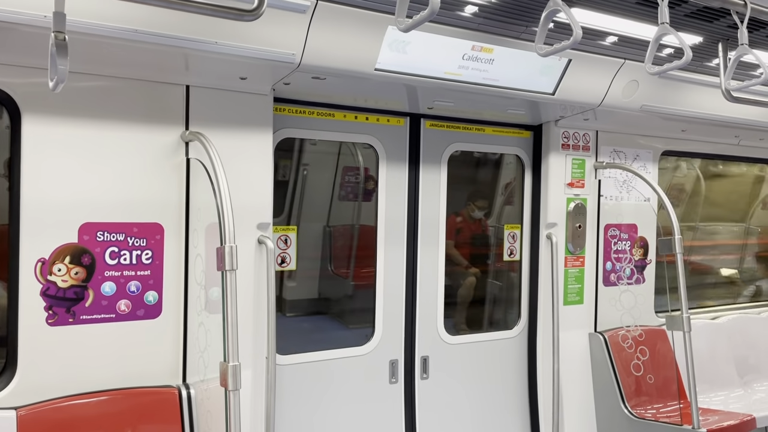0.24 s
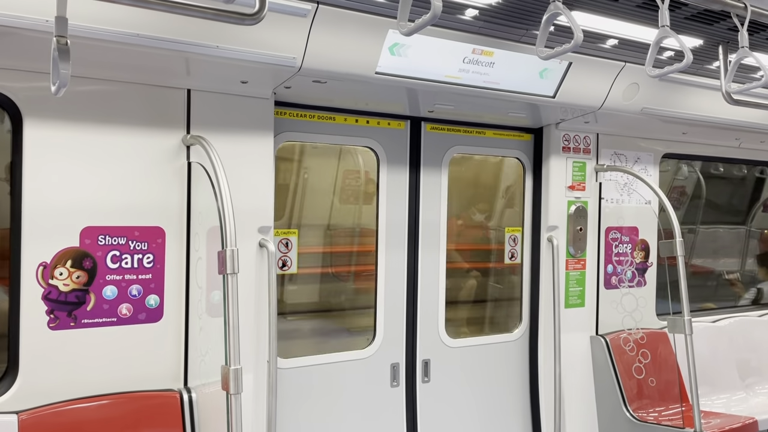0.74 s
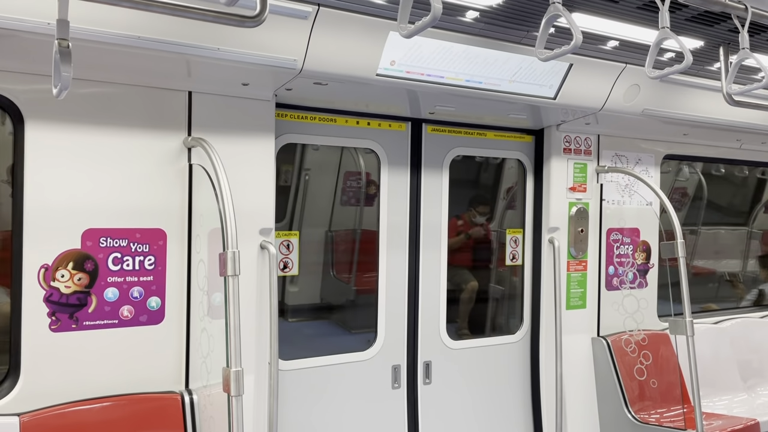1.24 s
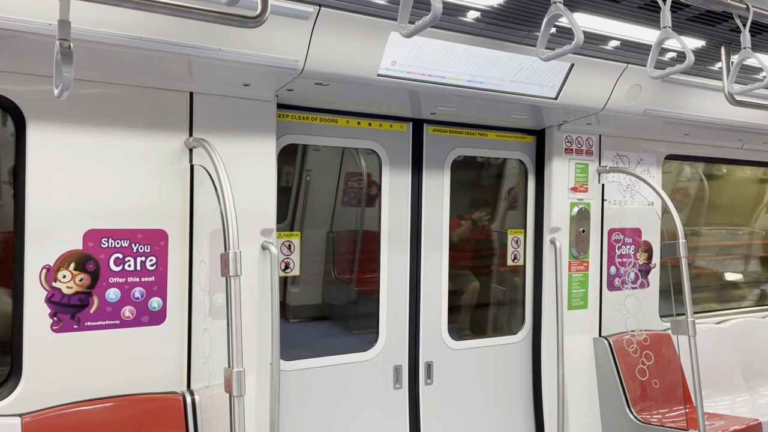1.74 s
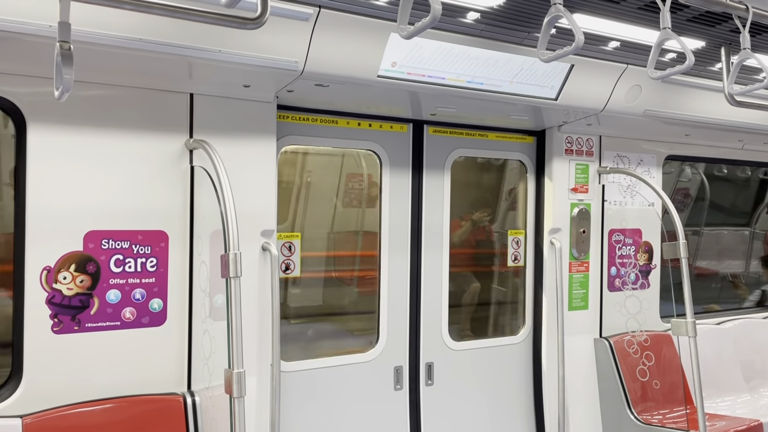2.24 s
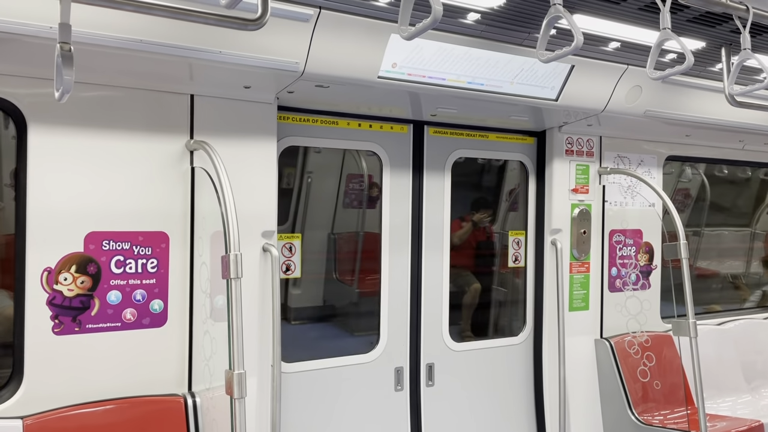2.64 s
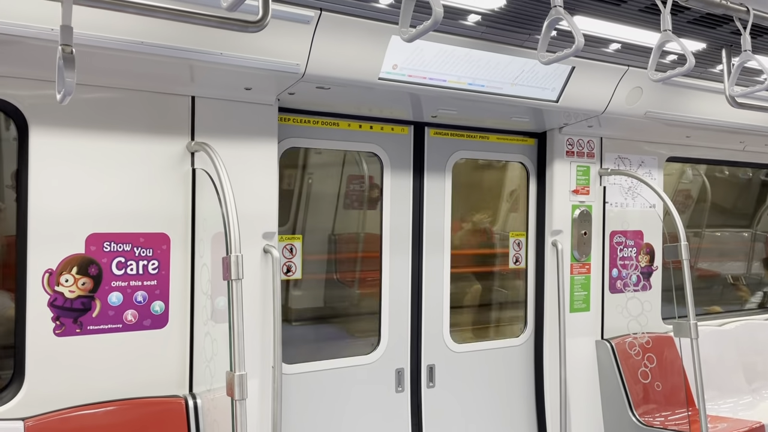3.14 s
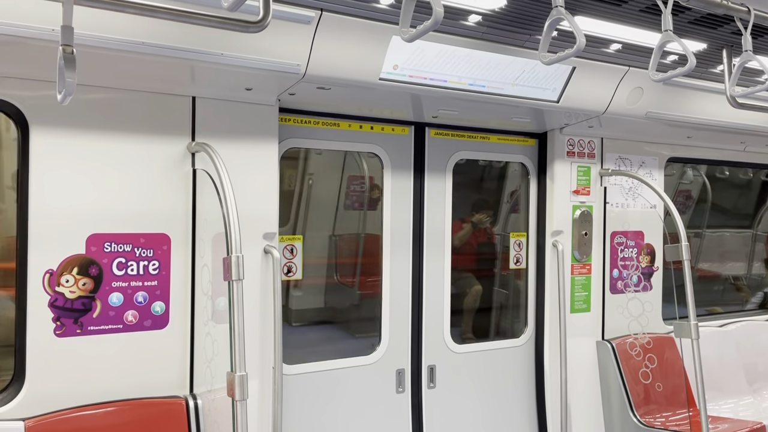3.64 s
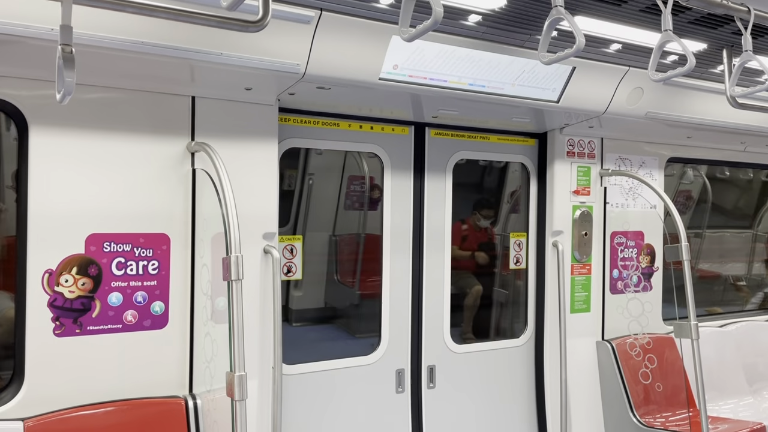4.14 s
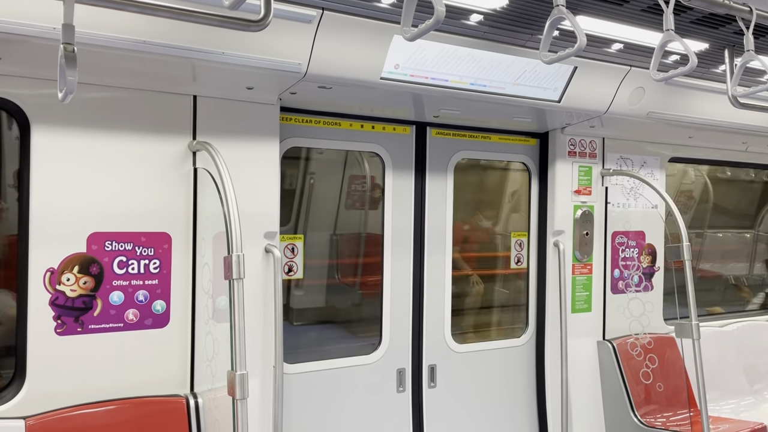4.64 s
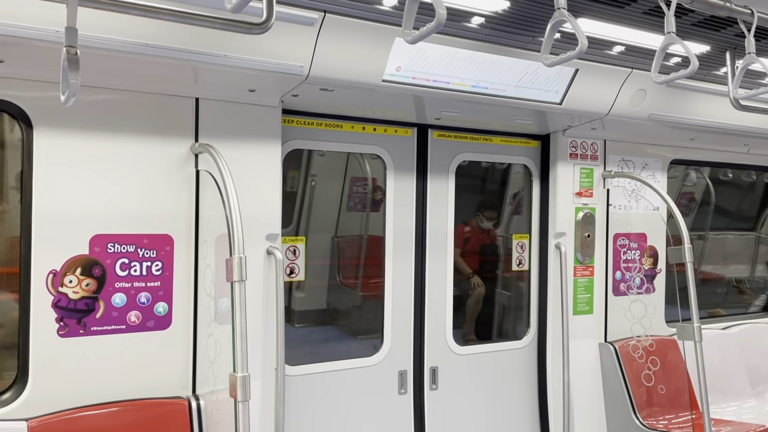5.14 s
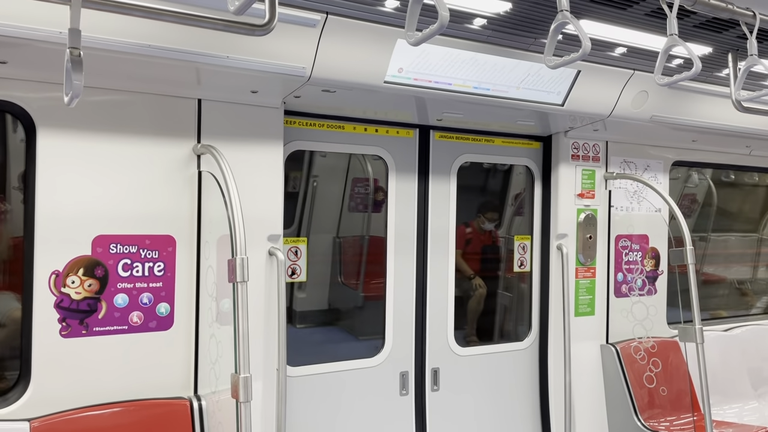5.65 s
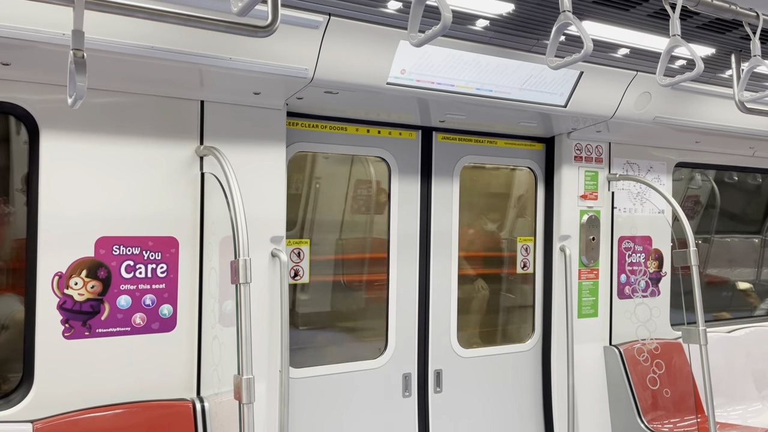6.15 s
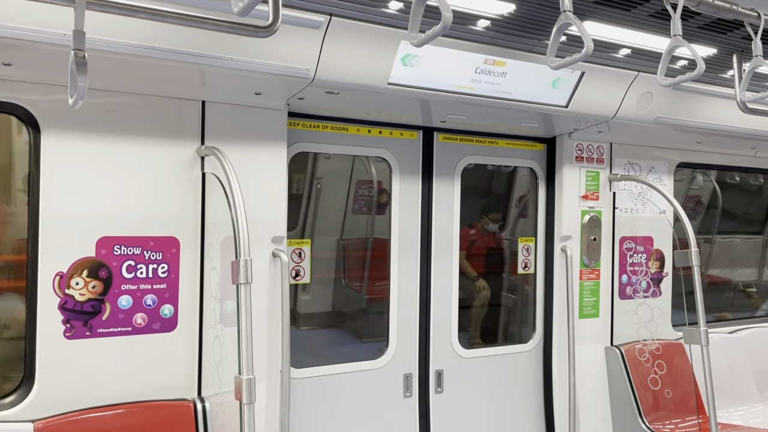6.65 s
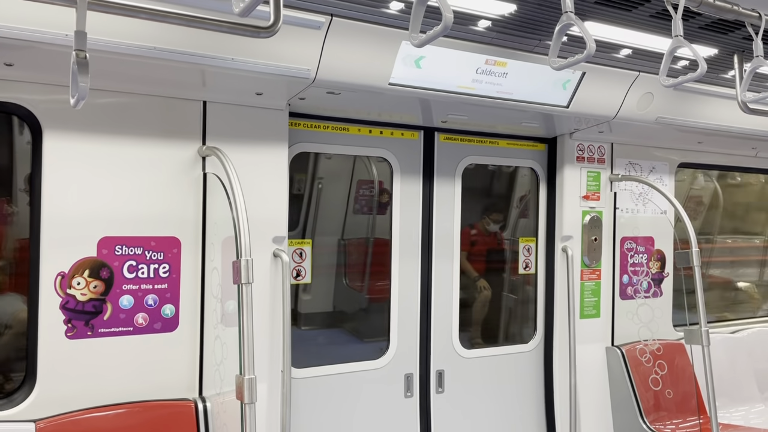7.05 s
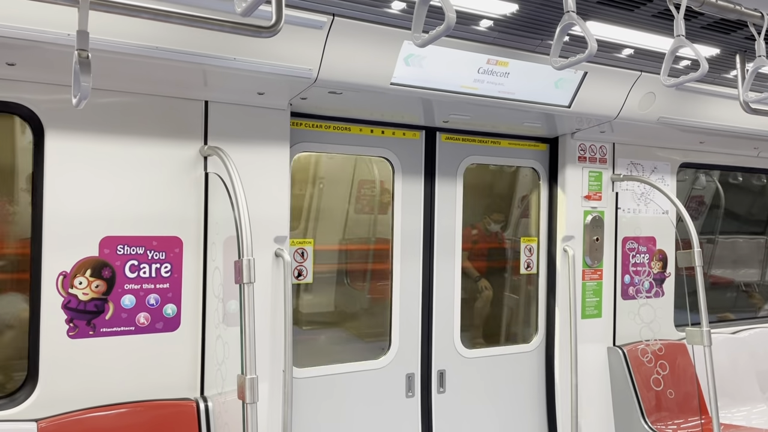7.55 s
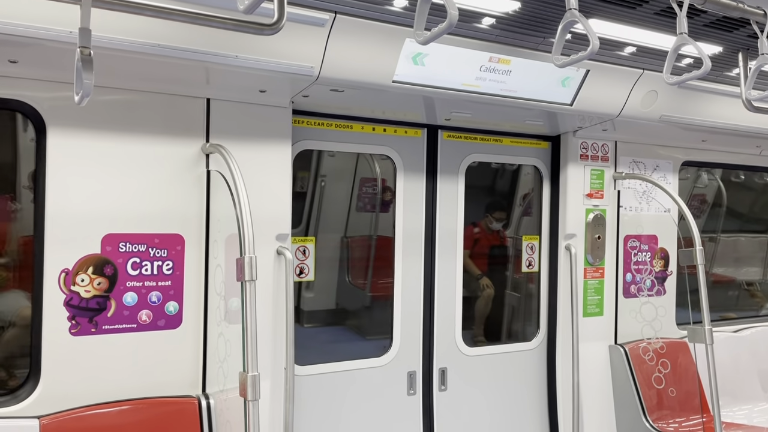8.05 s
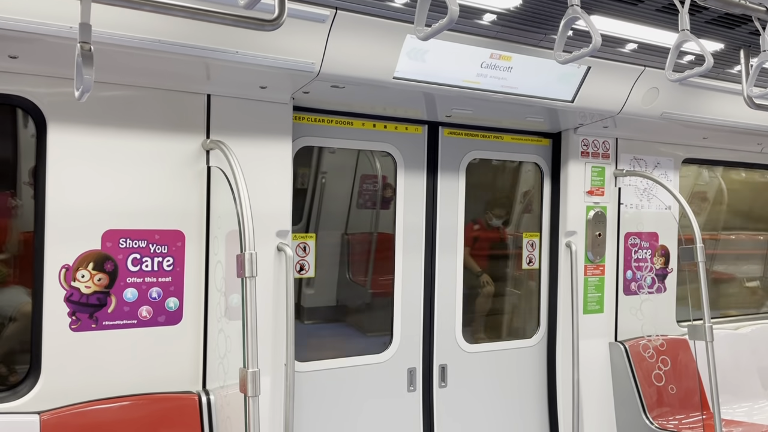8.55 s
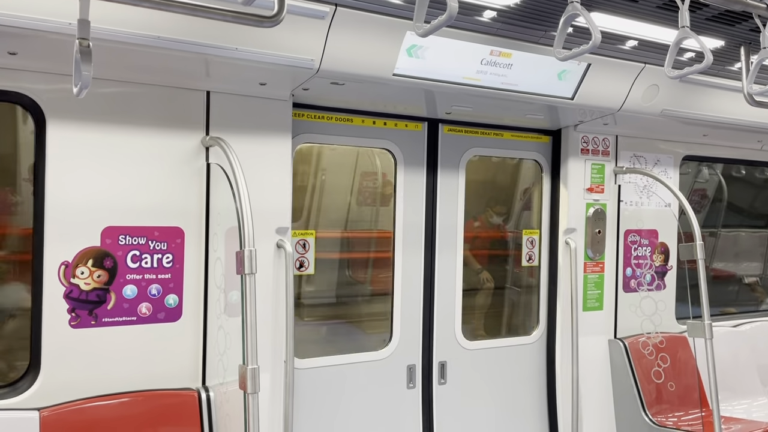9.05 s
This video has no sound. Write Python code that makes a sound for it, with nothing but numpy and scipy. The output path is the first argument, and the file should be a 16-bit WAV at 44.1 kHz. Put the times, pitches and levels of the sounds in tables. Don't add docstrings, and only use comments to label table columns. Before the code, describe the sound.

Inside a metro car speeding through a tunnel, a loud steady rail roar with low floor boom, wheel ring, draughty hiss and brief air puffs.

```python
import sys
import numpy as np
from scipy import signal
from scipy.fft import rfft, irfft, next_fast_len
from scipy.io import wavfile
from scipy.ndimage import uniform_filter1d, map_coordinates

SR = 44100
rng = np.random.default_rng(int(sys.argv[2]) if len(sys.argv) > 2 else 0)


def volts(x):
    e = np.asarray(x, float) / 20
    return 10 ** e


def output_pcm(signal):
    pcm = np.clip(np.atleast_2d(signal).T, -1, 1) * 32767
    wavfile.write(sys.argv[1], SR, np.round(pcm).astype(np.int16))


N = 410394

# (frequency [Hz], width [Hz], level [dB])
RAIL_MODES = [(672, 155, -7), (754, 303, -1.5), (938, 390, -8), (1297, 516, -12.5), (1474, 92, -21)]
# (frequency [Hz], width [Hz], level [dB])
FLOOR_MODES = [(50.3, 21, 0), (61.2, 15, 1.5), (86.4, 37, -2), (138.3, 57, -1.5), (170.7, 42, -11)]
# (frequency [Hz], width [Hz], level [dB])
PANEL_MODES = [(268.3, 93, 0.4), (328, 36, -1.5), (427.5, 223, 2)]
# (frequency [Hz], width [Hz], level [dB])
WHEEL_MODES = [(1987, 130, 4), (2106, 110, 4), (2230, 173, 1.5)]
# (time [s], level [dB])
ROUGHNESS = [
    (0.0, 2.5),
    (1.2, 1),
    (1.8, -0.1),
    (3.0, 0.24),
    (5.4, -1.05),
    (6.4, -2.5),
    (7.1, -2),
    (7.7, -0.6),
    (9.31, -0.95),
]
# (frequency [Hz], width [Hz], level [dB])
MOTOR_TONES = [(83, 16, -39.5), (145.4, 7.9, -43.5), (1426, 5.3, -47), (2005, 6.2, -49)]
# (frequency [Hz], level [dB])
SEAL_COLOUR = [(1000, -5.5), (1700, -0.5), (2600, -3), (3500, -8.5), (5300, -10.5), (6300, -19.5),
               (7300, -27), (10000, -34), (11500, -49), (13500, -51), (15500, -53)]
# (time [s], length [s], level [dB], lower edge [Hz])
PUFFS = [
    (2.335, 0.12, -38, 3000),
    (3.148, .13, -40, 4100),
    (4.40, .07, -66, 8140),
]
# (frequency [Hz], level [dB])
JET_COLOUR = [(2500, 7), (5100, 1), (6000, -7), (7000, -14), (10000, -25), (12000, -31), (15500, -33.5)]
# (frequency [Hz], likeness [0-1], left lead [rad], left minus right [dB])
PORTS = [(60, .975, .05, -1.7), (130, .94, .2, -3), (175, .8, .24, -4), (215, .55, .2, -1),
         (290, .75, .3, 0), (470, .26, .3, .3), (560, .42, .45, 1.1), (730, .27, 3, 2.5),
         (1100, .07, 1.6, 1), (1600, .42, -1, -2), (2150, .5, -.3, .5), (3000, .46, .8, 3.7),
         (5400, .4, .6, 3.6), (8300, .85, 0, 0)]

POWER_S, POWER_RISE_S = 6.73, 0.9


def rolling():
    turns_per_s = 6.9 + 0.19 * wobble(0.97)
    turn = np.sin(2 * np.pi * np.cumsum(turns_per_s) / SR)
    return rail_roar(turn) + floor_boom(turn) + panel_drum() + wheel_ring()


def rail_roar(turn):
    db = level(-21.5, per_rough=1.05, load_db=0.1) + 0.58 * turn + 0.69 * wobble(13)
    return volts(db) * rush(modes(RAIL_MODES, steep=2.29), patchy_db=0.92, bins=3, frames=4)


def floor_boom(turn):
    db = level(-31.5, per_rough=0.12, load_db=1.26) + 0.53 * turn
    return volts(db) * rush(modes(FLOOR_MODES, steep=1.61), patchy_db=1.4, bins=2, frames=10)


def panel_drum():
    db = level(-31.5, per_rough=0.17, load_db=1.4)
    return volts(db) * rush(modes(PANEL_MODES, steep=2.44), patchy_db=-0.63, bins=2, frames=20)


def wheel_ring():
    db = level(-36, per_rough=0.33, load_db=0.43) + 0.39 * wobble(10)
    return volts(db) * rush(modes(WHEEL_MODES, steep=1.6), patchy_db=2.7, bins=3, frames=5)


def traction():
    hum_db = level(-44.5, per_rough=0.4, load_db=7.4) + 1.4 * wobble(1.5)
    hum = volts(hum_db) * tone(271.8, width_hz=8.2)
    whine = volts(level(-28, per_rough=1.16, load_db=-4.5)) * tone(588, width_hz=55)
    faint = sum(volts(db) * tone(hz, width) for hz, width, db in MOTOR_TONES)
    return hum + whine + volts(level(0.2, per_rough=0.1, load_db=2.5)) * faint


def draught():
    db = level(-35, per_rough=0.88, load_db=-1) + 0.13 * wobble(6)

    def colour(hz):
        return volts(along(SEAL_COLOUR, hz)[0]) * (hz > 900)
    return volts(db) * rush(colour, patchy_db=0.38, bins=14, frames=10)


def valve():
    out, t = np.zeros((2, N)), np.arange(N) / SR
    for start, length, db, low_hz in PUFFS:
        def colour(hz):
            return volts(along(JET_COLOUR, hz)[0]) / (1 + (low_hz / (hz + 1)) ** 4)
        jet = unit(filtered(rng.standard_normal((2, N)), colour))
        opening = np.clip((t - start) / 0.03, 0, 1)
        after = np.clip(t - start - length, 0, None)
        closing, echo = 0.51 * volts(-60 * after / 0.14), 0.53 * volts(-60 * after / 0.9)
        out += volts(db) * opening * (closing + echo) * jet
    return out


def level(db, per_rough, load_db):
    load = np.clip((np.arange(N) / SR - POWER_S) / POWER_RISE_S, 0, 1)
    return db + per_rough * curves(ROUGHNESS)[0] + load_db * load


def rush(response, patchy_db, bins, frames):
    z = signal.stft(rng.standard_normal((2, N)), nperseg=1024)[2]
    patches = uniform_filter1d(rng.standard_normal(z.shape[1:]), bins, 0)
    patches = uniform_filter1d(patches, frames, 1)
    pair = signal.istft(z * volts(patchy_db * unit(patches)), nperseg=1024)[1][:, :N]
    return unit(filtered(pair, response))


def tone(hz, width_hz):
    return unit(filtered(rng.standard_normal((2, N)), modes([(hz, width_hz, 0)], steep=1.307)))


def modes(table, steep):
    def gain(f):
        power = 0
        for hz, width, db in table:
            off_tune = (f * f - hz * hz) / (f * width + 1e-9)
            power = power + volts(2 * db) / (1 + off_tune ** 2) ** steep
        return np.sqrt(power)
    return gain


def filtered(x, response):
    m = next_fast_len(N + 8192)
    return irfft(rfft(x, m) * response(np.fft.rfftfreq(m, 1 / SR)), m)[..., :N]


def wobble(rate):
    points = rng.standard_normal(int(N * rate / SR) + 4)
    return map_coordinates(points, [np.arange(N) * rate / SR])


def curves(rows):
    s, *cols = np.transpose(rows)
    return [np.interp(np.arange(N) / SR, s, c) for c in cols]


def along(points, hz):
    f, *cols = np.transpose(points)
    return [np.interp(np.log(hz + 1), np.log(f + 1), c) for c in cols]


def unit(x):
    return x / np.sqrt(np.mean(x ** 2) + 1e-20)


def scene():
    return rolling() + traction() + draught() + valve()


def low_pass(x):
    return signal.sosfilt(signal.butter(12, 15750, fs=SR, output="sos"), x)


def record(dry):
    def capsule(hz):
        dull_top = volts(-3 * np.clip(hz / 1000 - 9.8, 0, 3))
        return dull_top / np.sqrt(1 + (37 / (hz + 1)) ** 6)

    def ports(hz):
        like, lead, tilt_db = along(PORTS, hz)
        lead = lead - 2 * np.pi * np.clip(hz - 5200, 0, None) / 6400
        left = [1 + 0 * hz, 0 * hz]
        right = [like * np.exp(-1j * lead), np.sqrt(1 - like ** 2)]
        return np.array([left, right]) * volts([[tilt_db / 2], [-tilt_db / 2]])
    mix = filtered(filtered(dry, capsule), ports).sum(axis=1)
    return low_pass(mix)


dry = scene()
out = record(dry)
output_pcm(out)
```